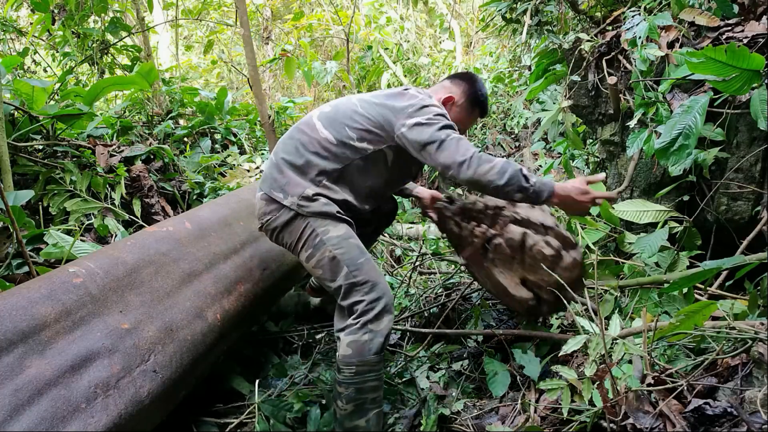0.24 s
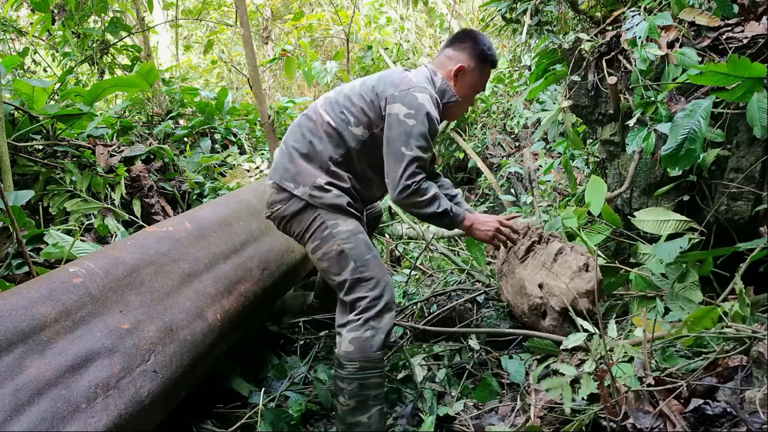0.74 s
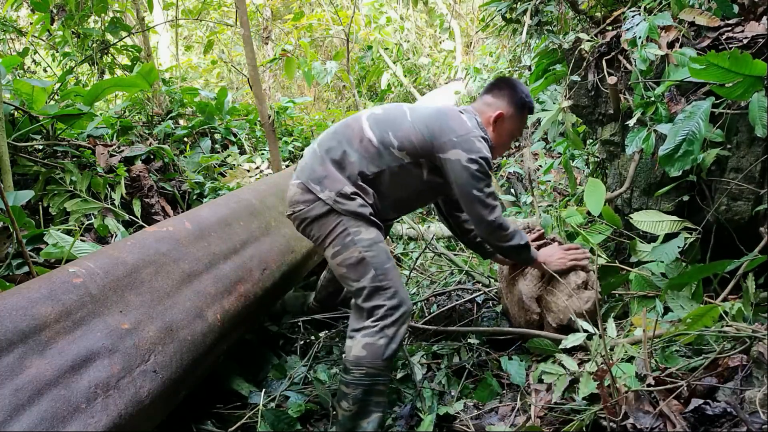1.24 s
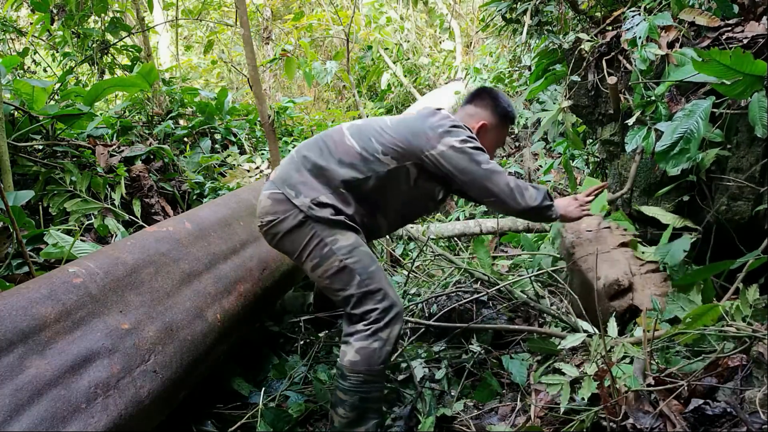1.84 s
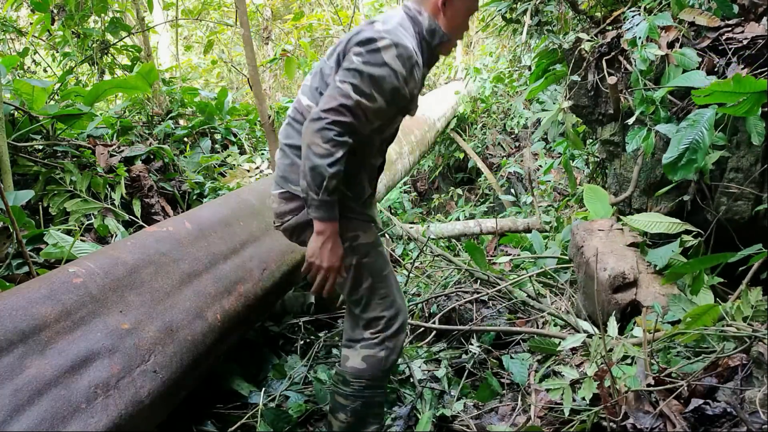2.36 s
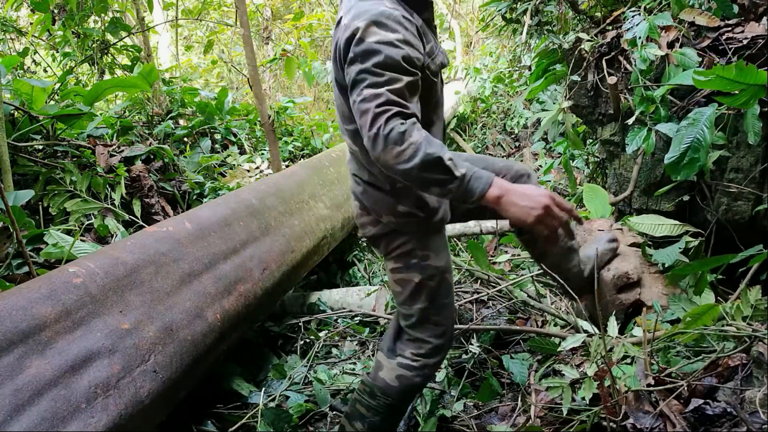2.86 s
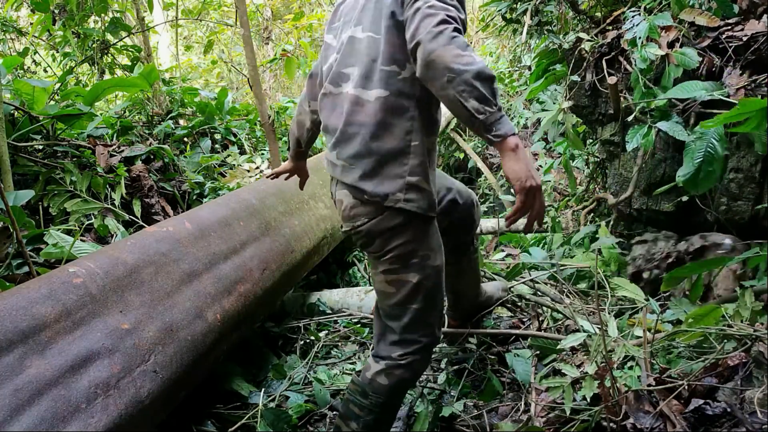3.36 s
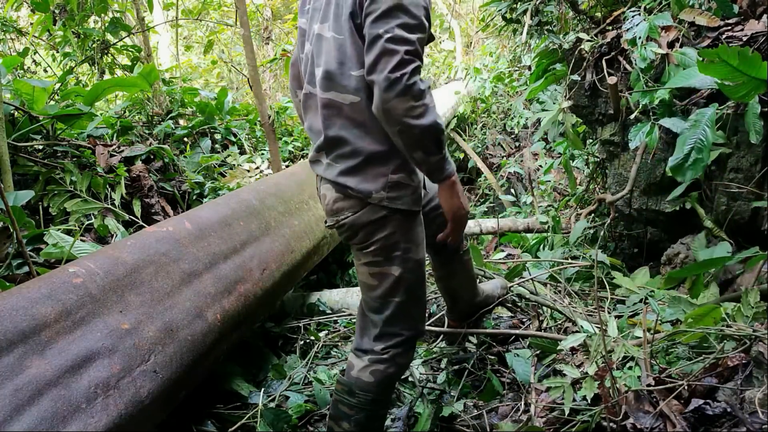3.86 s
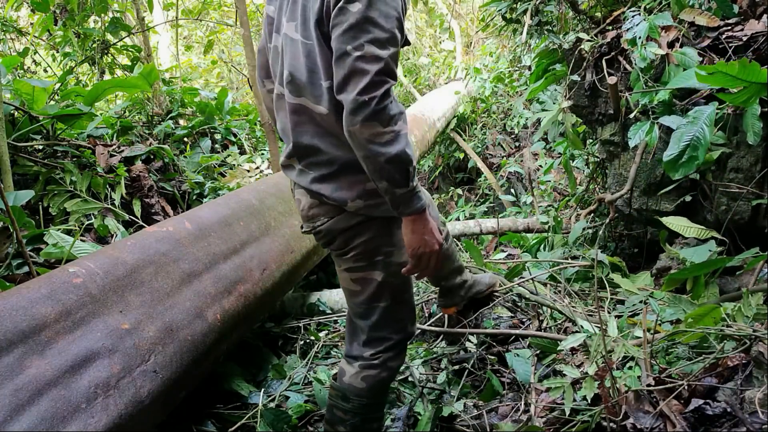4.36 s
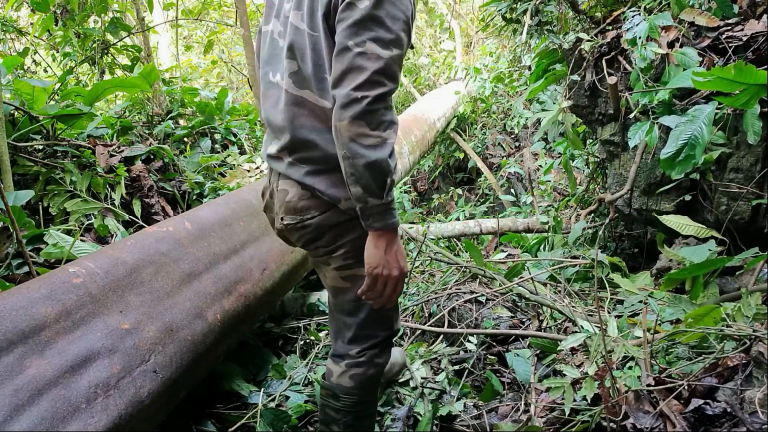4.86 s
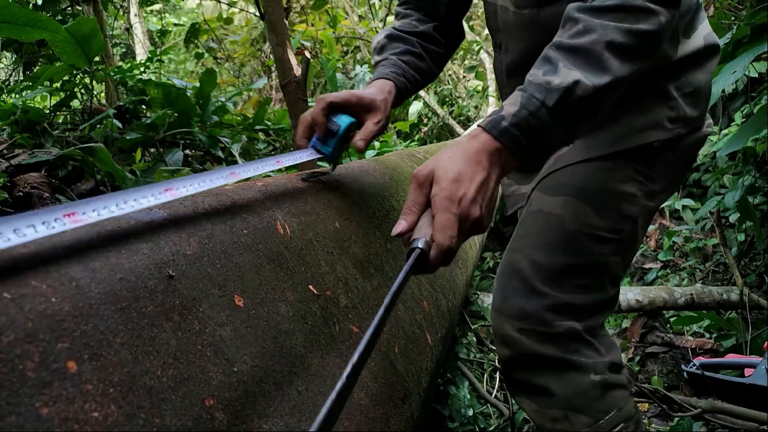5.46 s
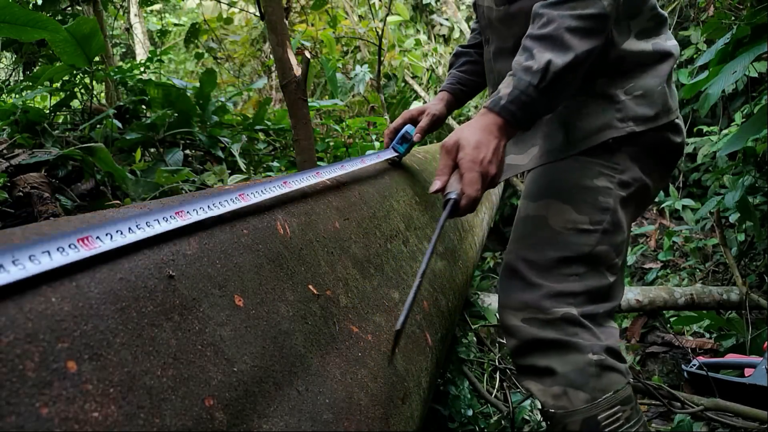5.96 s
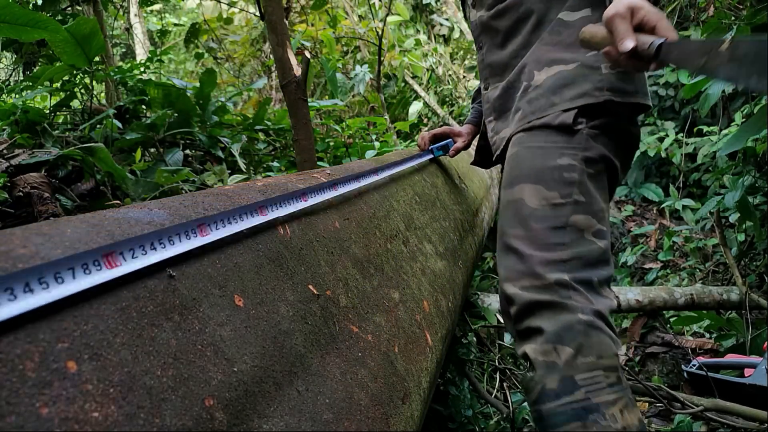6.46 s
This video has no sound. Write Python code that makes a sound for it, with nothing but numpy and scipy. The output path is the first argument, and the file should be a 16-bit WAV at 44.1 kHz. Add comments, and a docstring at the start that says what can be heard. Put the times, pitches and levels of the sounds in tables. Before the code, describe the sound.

Outdoors among trees, close to mid distance: a crash of leaves and twigs, a quiet pause with small scrapes, then a kick, crackling brush and two hollow woody thumps on soft soil, the first much the loudest. A twig snaps, cicadas slide and whine at left, and finally a barely audible tape hiss over bark with light rustling. Low air and insect hiss underneath.

```python
"""An offcut of wood crashes into leaf litter in a forest: a man tosses it, rolls it on and shoves it with a boot,
and it tumbles through the brush and lands with two hollow thumps. Each blow rings the wood's fading tones.
Snapping twigs and rustling leaves are made of many tiny noise grains, and soft earth answers with low tones.
Far cicadas whine in sliding notes and a blurred chorus; low air and a steady insect hiss are filtered noise."""
import sys
import numpy as np
from scipy import signal
from scipy.fft import rfft, irfft, next_fast_len
from scipy.io import wavfile

SR = 44100
rng = np.random.default_rng(int(sys.argv[2]) if len(sys.argv) > 2 else 0)


def master_out(mix):
    """Clip the mix to full scale and print it as 16-bit PCM to the path in sys.argv[1]."""
    frames = np.transpose(np.atleast_2d(mix))
    ceiling = np.clip(frames, -1, 1)
    pcm = np.round(ceiling * 32767).astype(np.int16)
    wavfile.write(sys.argv[1], SR, pcm)


N = 295911
TIME = np.arange(N) / SR


def undb(db):
    """Turn decibels into a gain."""
    return 10 ** (np.asarray(db) / 20)


def pan(left_minus_right_db):
    """Gains for left and right that differ by this many decibels."""
    return undb(np.array([[left_minus_right_db], [-left_minus_right_db]]) / 2)


def unit(x):
    """Scale to an rms (average strength) of 1."""
    return x / np.sqrt(np.mean(x ** 2))


def shape(x, gain):
    """Filter a sound by a gain that depends on frequency."""
    size = next_fast_len(x.shape[-1] + 2048)
    hz = np.fft.rfftfreq(size, 1 / SR) + 1  # the extra 1 Hz keeps logarithms finite
    return irfft(rfft(x, size) * gain(hz), size)[..., :x.shape[-1]]


def colour(x, points, tilt=0):
    """Filter by a curve of (Hz, dB) points, tilted in dB per octave, then scale to rms 1."""
    hz, db = np.transpose(points)

    def gain(f):
        return undb(np.interp(np.log(f), np.log(hz), db) + tilt * np.log2(f))
    return unit(shape(x, gain))


def walk(rate_hz):
    """A smooth random wander with rms 1; a higher rate wanders faster."""
    return unit(shape(rng.standard_normal(N), lambda f: np.exp(-(f / rate_hz) ** 2)))


def fade(t, t60):
    """Exponential decay that falls by 60 dB in t60 seconds."""
    return np.exp(-np.log(1000) * t / t60)


def add(out, start_s, x):
    """Mix x into out from start_s on."""
    i = int(start_s * SR)
    out[..., i:i + x.shape[-1]] += x[..., :N - i]


def ports(x, lag):
    """Place a sound to the right by delaying the left side by lag samples; a negative lag places it left."""
    left = shape(x, lambda f: np.exp(-2j * np.pi * f * lag / SR))
    return np.array([left, x])


def crackle(size, spread_db, share):
    """Dense tiny fractures of very unequal size; a share comes from the right, the rest is scattered."""
    grain_db = spread_db * np.minimum(rng.exponential(size=(3, size)), 6)
    grains = rng.standard_normal((3, size)) * undb(grain_db)
    return np.sqrt(share) * ports(grains[0], 12) + np.sqrt(1 - share) * grains[1:]


def band(hz, width_hz):
    """Noise in a band around a fixed or moving pitch, different on each side."""
    turn = np.exp(2j * np.pi * np.cumsum(hz * np.ones(N)) / SR)
    return np.array([unit(np.real((walk(width_hz) + 1j * walk(width_hz)) * turn)) for _ in range(2)])


# colour of the low stirring air: pitch_hz, level_db (relative, per Hz)
AIR_COLOUR = [(15, 5.5), (28, 3), (60, -3), (130, -15), (300, -13.5), (700, -28.5), (1500, -34),
              (4500, -26.5), (9000, -41), (15500, -36.5)]
# colour of the insect hiss: pitch_hz, level_db (relative, per Hz)
INSECT_COLOUR = [(3500, -15.5), (5800, -13), (6700, -4.5), (7300, -0.5), (7900, -6.5), (8500, -42),
                 (12000, -40.5)]


def forest(air_db=-63, insect_db=-66, apart_hz=700, pan_db=6.0):
    """Low stirring air, nearly alike on both sides in the bass, and a band of shrilling insects."""
    mid, side = rng.standard_normal((2, N))
    side = shape(side, lambda f: np.minimum(0.13 + f / apart_hz, 1))
    air = colour(np.array([mid + side, mid - side]), AIR_COLOUR) * undb(air_db + 1.0 * walk(3.1))
    insects = colour(rng.standard_normal((2, N)), INSECT_COLOUR) * undb(insect_db + 1.8 * walk(40))
    return air * pan(pan_db) + insects


def chorus(pitch_hz=1522, lower_db=-71.5, upper_db=-68.5, drop_s=5.13, drop_db=-8):
    """Distant cicadas merge into two narrow bands an octave apart; from drop_s on, the level is lower."""
    level_gain = undb(drop_db * np.clip((TIME - drop_s) / 0.018, 0, 1))
    lower = undb(lower_db) * band(pitch_hz, width_hz=150)
    upper = undb(upper_db) * band(2 * pitch_hz, width_hz=340)
    return level_gain * (lower + upper)


# movements through the undergrowth: peak_s, leaf_db (rustle), scuff_db (dull scuffing),
# swell_s (time to rise by 60 dB), fade_s (time to fall by 60 dB)
# a negative swell_s means the movement is already dying down before its peak_s
MOVES = [(.03, -62, -61, -8, 0.96), (.402, -48, -47, .08, .2), (.45, -37.5, -48, .14, .2),
         (0.479, -25, -34, 0.1, 0.12), (.58, -49, -53, .2, 2.3), (.87, -71, -58, 1.7, 0.2),
         (1.03, -62.5, -64, 0, .5), (1.625, -51.5, -57, 0.3, 0.3), (1.97, -54.5, -56, 1.2, 1.6),
         (2.56, -65, -60.5, 0.5, 0.3), (4.14, -54, -57.5, 0.51, 0.28), (3.07, -45, -48, 0.3, 1.2),
         (3.17, -48, -47, .3, .4), (3.32, -48, -46, .45, .45), (3.42, -50, -44, 0.2, .45),
         (3.52, -47, -44.5, .5, .9), (3.8, -57, -57, 1, 1.2), (5.082, -63.5, -68, 2, 1),
         (5.599, -72.5, -68.5, 1.5, 4.5), (6.5, -72, -66, .5, 2.5), (6.63, -57.5, -61, 0.77, 7)]


def stirring(rest_leaf_db=-69.5, rest_scuff_db=-75):
    """Gains of rustle and scuffing: movements swell and fade, and their powers add to a faint rest level."""
    leaf_power, scuff_power = undb(rest_leaf_db) ** 2, undb(rest_scuff_db) ** 2
    for peak_s, leaf_db, scuff_db, swell_s, fade_s in MOVES:
        motion = fade(np.abs(TIME - peak_s), np.where(TIME < peak_s, swell_s, fade_s))
        leaf_power = leaf_power + (undb(leaf_db) * motion) ** 2
        scuff_power = scuff_power + (undb(scuff_db) * motion) ** 2
    return np.sqrt(leaf_power), np.sqrt(scuff_power)


# colour of leaves and twigs, used by the snaps too: pitch_hz, level_db (relative, per Hz)
LEAF_COLOUR = [(150, -11.5), (400, -6.5), (800, 0.5), (1300, 4), (3000, 4.5), (5500, 0), (8000, -3),
               (12000, -10.5), (15500, -18.5)]
# colour of dull scuffing on soil: pitch_hz, level_db (relative, per Hz)
SCUFF_COLOUR = [(25, -9), (70, 0), (250, 0), (450, -7), (750, -2), (1300, -12), (2500, -19), (8000, -47)]


def undergrowth(pan_db=-1, tick_db=-9, flutter_db=2.1, scuff_flutter_db=3):
    """Leaves crackle in clumps, with single stalks ticking, while bark, boots and cloth scuff the soil."""
    leaf_gain, scuff_gain = stirring()
    grains = crackle(N, spread_db=4.5, share=.15)
    leaves = colour(grains, LEAF_COLOUR, tilt=-0.64) * undb(flutter_db * walk(40))
    # stalks tick more often the harder the leaves are stirred: up to 220 a second, from a rustle of -52 dB
    stalks_per_s = 220 * np.minimum(leaf_gain / undb(-52), 1)
    stalks = (rng.random(N) < stalks_per_s / SR) * rng.uniform(0.52, 1, N) ** 2
    # each tick is a burst of noise dying away within milliseconds
    ticks = signal.lfilter([1], [1, -np.exp(-1 / (0.00073 * SR))], stalks) * rng.standard_normal(N)
    leaves = leaves + undb(tick_db) * colour(ports(ticks, 10), LEAF_COLOUR, tilt=-1)
    soil = crackle(N, spread_db=3.5, share=0.84)
    scuff = colour(soil, SCUFF_COLOUR) * undb(scuff_flutter_db * walk(30))
    return leaves * leaf_gain * pan(pan_db) + scuff * scuff_gain


# notes of the far cicadas: start_s, length_s, pitch_hz (lower partial at mid-note), step_hz (upward slide),
# level_db (upper partial, before waver and blur), lower_db (lower partial minus upper)
NOTES = [(0.029, 0.24, 1472, 25.5, -58.5, -23), (0.142, 0.3, 1540, 10.5, -69.5, -1),
         (0.62, 0.27, 1544, 11, -67, 0), (1.08, 0.25, 1531, 10.5, -70.5, 2.5),
         (2.34, 0.3, 1510, 10.5, -73, 2), (2.873, 0.19, 1530, 10, -73, 2),
         (3.858, 0.28, 1533, 20, -62, -9.5), (4.228, 0.09, 1546, 0, -59, -7),
         (4.25, .12, 1526, 15, -64.5, -5.5), (4.345, 0.18, 1577, 41.5, -56, -6.5),
         (4.52, 0.25, 1538, 33.5, -59.5, -12.5), (4.555, .08, 1597, 0, -63, -8.5),
         (4.76, 0.14, 1573, 0, -53, -9), (4.86, .13, 1602, 26, -57.5, -6), (4.95, 0.17, 1612, 8, -63, -6.5),
         (5.04, 0.11, 1530, 20, -57.5, -11), (5.56, 0.21, 1560, 15, -68.5, -20),
         (6.132, 0.35, 1561, 10, -72, -11.5)]


def cicadas(blur_hz=60, blur_db=-7, waver_hz=13, waver_db=2, slide_s=.03, edge_share=.3):
    """Whining two-partial notes from the left; most slide up a step, all waver, and tree paths blur them."""
    out = np.zeros((2, N))
    for partial in (1, 2):
        blur = partial * blur_hz
        paths = np.array([walk(blur) + 1j * walk(blur) for _ in range(2)])
        tone = np.zeros(N, complex)
        for start_s, length_s, pitch_hz, step_hz, level_db, lower_db in NOTES:
            t = np.arange(int(length_s * SR)) / SR
            pitch = pitch_hz + step_hz / 2 * np.tanh((t - length_s / 2) / slide_s)
            to_edge_s = np.minimum(t, length_s - t)
            swell = np.sin(np.pi / 2 * np.clip(to_edge_s / (edge_share * length_s), 0, 1))
            gain = undb(level_db + lower_db * (partial == 1))
            add(tone, start_s, gain * swell * np.exp(2j * np.pi * partial * np.cumsum(pitch) / SR))
        direct = ports(np.sqrt(2) * tone.real, -3.5)
        blurred = undb(blur_db) * (paths * tone).real
        out += (direct + blurred) * undb(waver_db * walk(waver_hz))
    return out


# leaves crushed and twigs snapped: start_s, level_db (rms at the start), t60_s (time to fall by 60 dB),
# tilt_db (per octave), pan_db (left minus right)
SNAPS = [(.33, -56, 0.22, 3, -6), (0.387, -43, 0.22, -1, -5), (.476, -21.5, 0.068, 0, 17),
         (.48, -16.5, 0.17, 1.7, 0), (.572, -48, 0.21, 3, -5), (.683, -49, 0.22, 1, -5),
         (1.425, -59.5, 0.14, 2, -6), (1.609, -46, 0.17, -4, -5), (1.634, -42.5, 0.17, 3.5, -3),
         (1.955, -43.5, 0.19, 0.5, -4), (2.075, -50, 0.1, 22, -8), (3.016, -50, 0.67, -0.5, -3),
         (3.057, -30.5, 0.044, 0, -4.5), (3.073, -33, 0.19, 6, -4.5), (3.13, -32, 0.19, 2, -5),
         (3.175, -41.5, 0.07, 1.5, -4), (3.215, -45, 0.4, 5.5, -3), (3.319, -45, .06, -4, -2),
         (3.485, -40, 0.2, 1, -4), (3.562, -40, 0.31, 0, -4), (3.602, -36.5, 0.23, -3.5, -2),
         (3.748, -48, .12, -1, -3), (3.997, -57.5, 0.69, 4, -4), (4.097, -47, 0.06, -1.5, -6),
         (4.177, -30.5, 0.024, 1, -4.5), (4.18, -38, 0.16, 0.5, -1.5), (5.079, -53, 0.14, 3, -5),
         (5.68, -55, 0.17, 4.5, 3)]


def snaps(attack_s=0.0012):
    """Bursts of tiny fractures that start almost at once and die away."""
    out, t = np.zeros((2, N)), np.arange(SR // 3) / SR
    for start_s, level_db, t60_s, tilt_db, pan_db in SNAPS:
        grains = colour(crackle(len(t), spread_db=4, share=0.16), LEAF_COLOUR, tilt_db)
        burst = grains * fade(t, t60_s) * (1 - np.exp(-t / attack_s))
        add(out, start_s, burst * undb(level_db) * pan(pan_db))
    return out


# blows on the block: start_s, peak_db, contact_hz (higher is a harder contact),
# hold (0 to 1, how firmly hand, boot or brush holds it)
KNOCKS = [(.474, -19, 417, 0.18), (1.609, -41, 1380, 0.85), (1.956, -42, 350, 0.38), (2.029, -52, 252, .05),
          (2.897, -29, 1430, 0.4), (3.264, -35.5, 301, 0), (3.286, -34, 219, 0),
          (3.563, -25.5, 333.4, 0.29), (2.151, -47, 950, 1), (3.394, -35.5, 1400, 1), (3.41, -38, 300, .02),
          (3.492, -34, 260, .03), (3.514, -33, 750, .7), (1.634, -33, 1700, 1), (3.593, -2.5, 880, 0),
          (3.599, -20, 1700, 1), (3.744, -16, 280, 0), (3.615, -23, 418.7, 0.28), (3.644, -25.5, 400, 0.52),
          (3.676, -36.5, 420, .4), (3.749, -36, 1900, 1), (3.753, -27, 495, 0.73), (3.786, -27, 226, 0),
          (4.176, -32.5, 1610, 1), (6.702, -39.5, 1280, 1)]
# ringing tones of the free block: pitch_hz, level_db (relative), t60_s (time to fall by 60 dB),
# lean_db (left minus right)
BLOCK_TONES = [(97, -6, 0.17, -1), (154, 3, 0.12, -2), (173, -3.5, 0.13, -2), (243, -.5, 0.11, 1),
               (290.5, -1, 0.11, 0), (325, -.5, 0.129, 1.5), (366, 1, 0.14, 1), (422, -9, 0.092, 2),
               (463.3, -5, 0.14, -5), (522, -8, .09, -4), (578, 0.5, 0.11, -5), (690, -7, 0.12, 4),
               (785, -8, 0.12, 1), (908.4, -1, 0.07, -5), (985, 0.5, 0.059, 1), (1076, 2.5, 0.045, 2),
               (1190, -3, .035, 8.5), (1460, -1, 0.043, 1), (1630, -3.5, .05, 0)]


def block(crack_db=-19, crack_t60=0.16, side_db=-14, surge=0.63, surge_t60=0.054):
    """Blows ring the wood's fading tones; soft contact leaves the low ones, and a firm hold chokes them."""
    out, t = np.zeros((2, N)), np.arange(SR // 2) / SR
    ring = np.zeros((2, len(t)))
    for k, (pitch_hz, level_db, t60_s, lean_db) in enumerate(BLOCK_TONES):
        tone = ports(fade(t, t60_s) * np.sin(2 * np.pi * pitch_hz * t), 10)
        # neighbouring tones push the far face in opposite directions
        ring += (-1) ** k * undb(level_db) * pan(lean_db) * tone
    # bark crushes for a moment, then the ground soaks up the first surge
    press = (1 - np.exp(-t / 0.0013)) * (1 + surge * fade(t, surge_t60))
    free_hz, held_hz = 69.9, 520  # lowest ring of the free and the firmly held block
    for start_s, peak_db, contact_hz, hold in KNOCKS:
        low_hz = free_hz * (held_hz / free_hz) ** hold
        damping_per_s = 120 * hold ** 2
        grit = 10 * rng.standard_normal((3, len(t))) * fade(t, crack_t60)
        crack = undb(crack_db) * ports(grit[0], 11) + undb(side_db) * grit[1:]
        hit = (ring + crack) * press * np.exp(-damping_per_s * t)
        hit = signal.sosfilt(signal.butter(3, contact_hz, fs=SR, output="sos"), hit)
        hit = signal.sosfilt(signal.butter(2, low_hz, "high", fs=SR, output="sos"), hit)
        add(out, start_s, undb(peak_db) * hit / np.abs(hit).max())
    return out


# soft earth giving under the block or a footstep: start_s, level_db (peak before the wobble), pitch_hz,
# t60_s (time to fall by 60 dB), pan_db (left minus right)
THUDS = [(.474, -18.5, 231.8, 0.15, 6.5), (0.474, -22.5, 89, 0.12, 4.5), (.53, -35, 64.2, 0.36, 4),
         (2.897, -32.5, 206.5, 0.074, 0), (3.29, -41, 70, 0.35, 0), (3.497, -39, 57.3, 1, 0.5),
         (3.596, -17, 184, 0.16, -0.5), (3.635, -38, 66, .3, 0), (3.748, -41, 52, .6, 0),
         (4.089, -52, 76.1, .4, 3)]


def earth(wobble_db=2.5):
    """The forest floor answers a landing or a step with a short low tone of uneven level."""
    out, t = np.zeros((2, N)), np.arange(SR // 2) / SR
    for start_s, level_db, pitch_hz, t60_s, pan_db in THUDS:
        tone = fade(t, t60_s) * np.sin(2 * np.pi * pitch_hz * t)
        add(out, start_s, undb(level_db) * pan(pan_db) * ports(tone, 8.1))
    return out * undb(wobble_db * walk(45))


def scatter(x, t60, damp_hz):
    """Diffuse echoes from trunks and foliage: a fading noise tail, different on each side, softer on top."""
    t = np.arange(SR) / SR
    tail = rng.standard_normal((2, SR)) * fade(t, t60) * (1 - np.exp(-t / 0.0069))
    tail = shape(tail, lambda f: 1 / (1 + 1j * f / damp_hz))
    return signal.fftconvolve(x, unit(tail) / np.sqrt(SR), axes=1)[:, :N]


def swish(stroke, level_db, width_hz):
    """A band of friction noise that slides in pitch as the stroke swells and dies."""
    start_s, length_s, first_hz, last_hz = stroke
    along = np.clip((TIME - start_s) / length_s, 0, 1)
    pitch = first_hz + (last_hz - first_hz) * along
    return band(pitch, width_hz) * undb(level_db) * np.sin(np.pi * along) ** 2


# a faint rising swish: start_s, length_s, first_hz, last_hz
SWISH = (.84, .29, 950, 2200)
# a steel tape sliding over bark: start_s, length_s, first_hz, last_hz
TAPE = (5.12, .8, 5700, 5900)


def friction():
    """Sliding friction: a rising swish with a narrow core, then a steel tape rubbing over bark as a wide hiss."""
    rising = swish(SWISH, level_db=-56.5, width_hz=760)
    core = swish(SWISH, level_db=-58, width_hz=54)
    return rising + core + swish(TAPE, level_db=-61, width_hz=4500)


def scene():
    """Wood and brush a few metres away, with a thin echo from the trees."""
    wood, brush = block() + earth(), snaps()
    wood_echo = undb(-31.5) * scatter(wood, t60=0.53, damp_hz=2490)
    brush_echo = undb(-21) * scatter(brush, t60=0.9, damp_hz=7000)
    background = forest() + chorus() + cicadas()
    return background + undergrowth() + wood + brush + wood_echo + brush_echo + friction()


def record(dry, top_hz=15700):
    """A steep filter cuts the sound above top_hz."""
    return signal.sosfilt(signal.ellip(10, .2, 80, top_hz, fs=SR, output="sos"), dry)


dry = scene()
out = record(dry)
master_out(out)
```